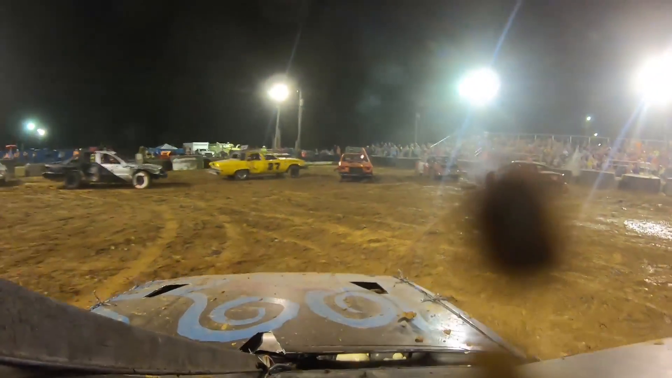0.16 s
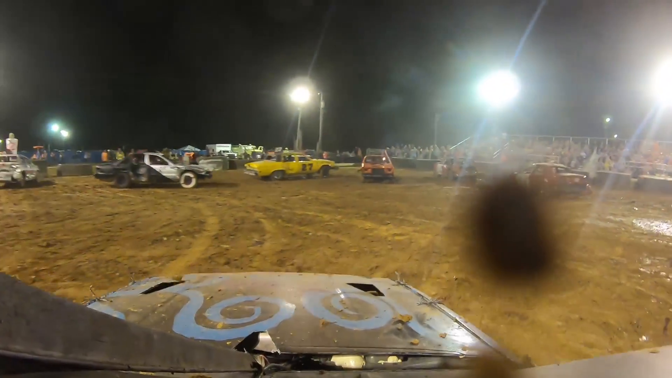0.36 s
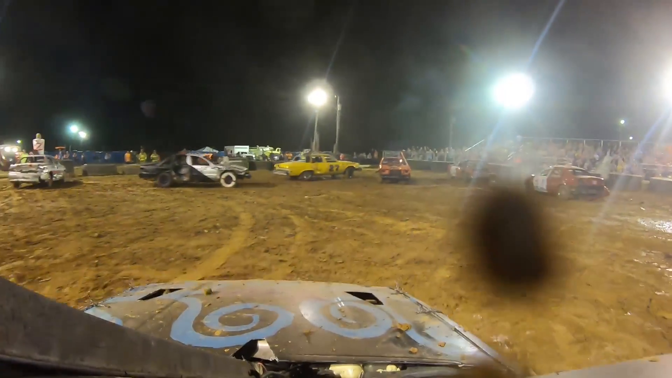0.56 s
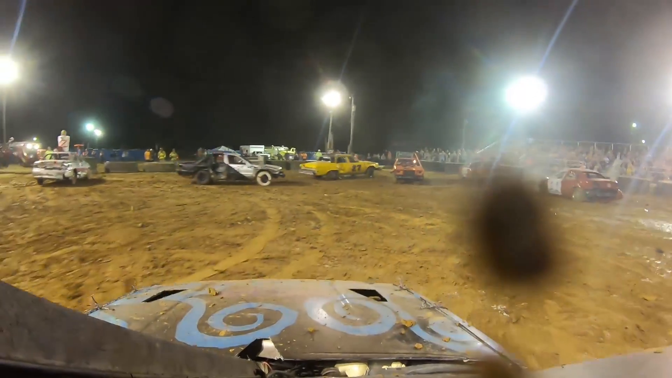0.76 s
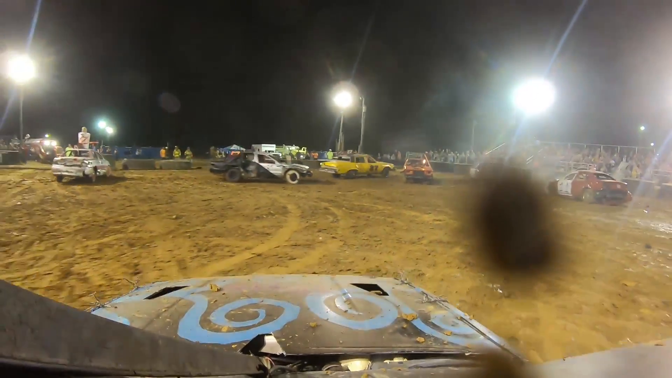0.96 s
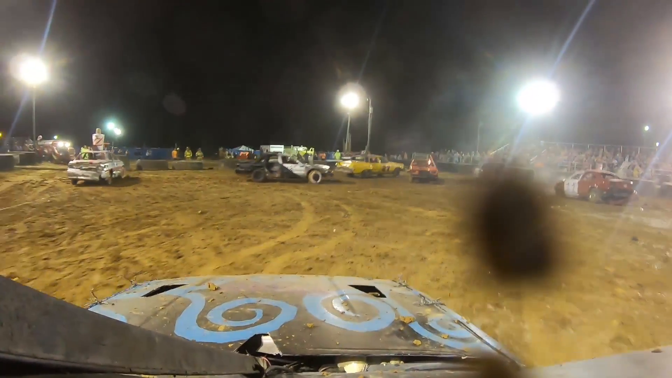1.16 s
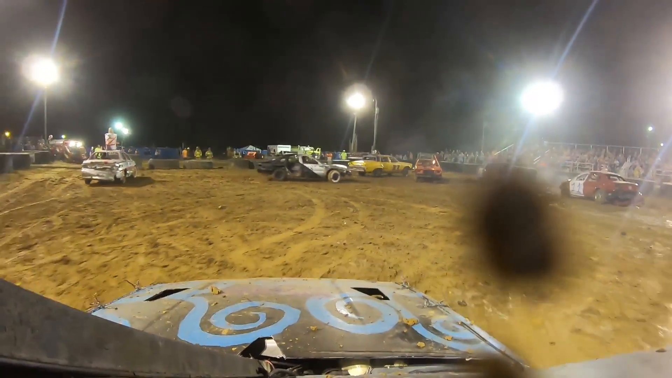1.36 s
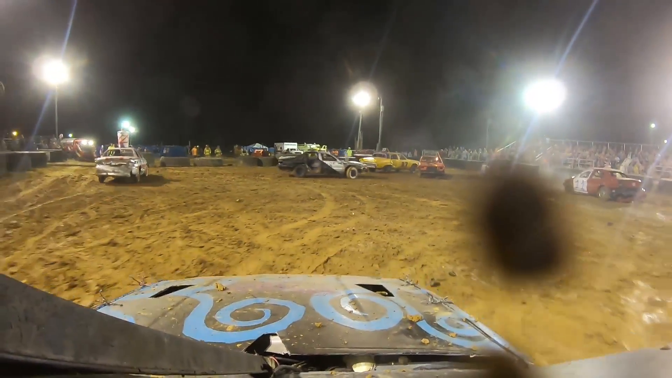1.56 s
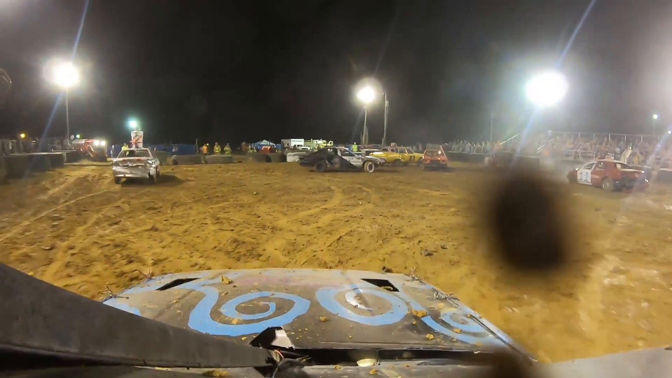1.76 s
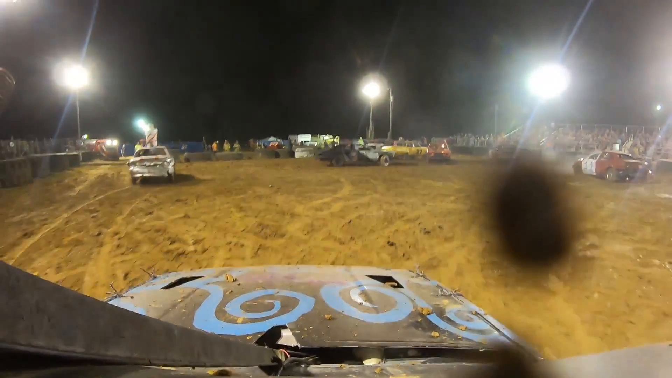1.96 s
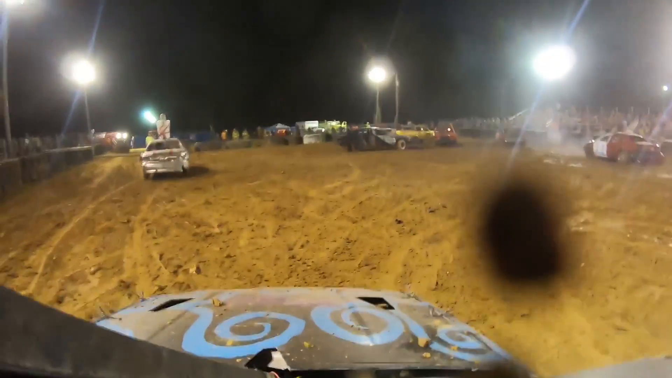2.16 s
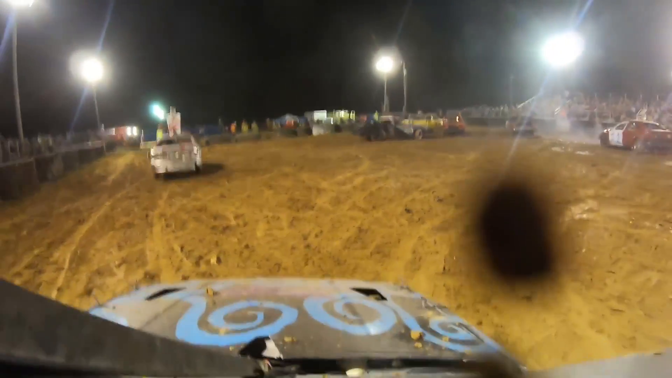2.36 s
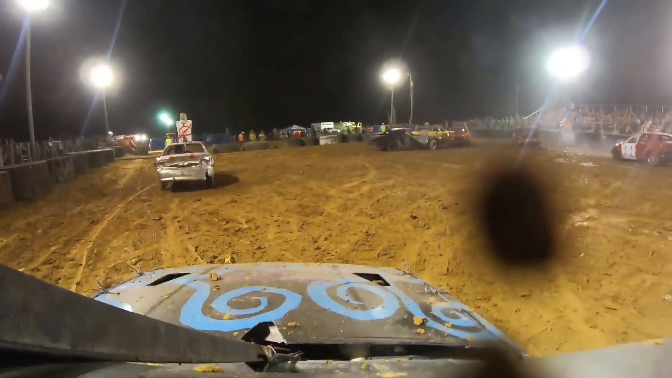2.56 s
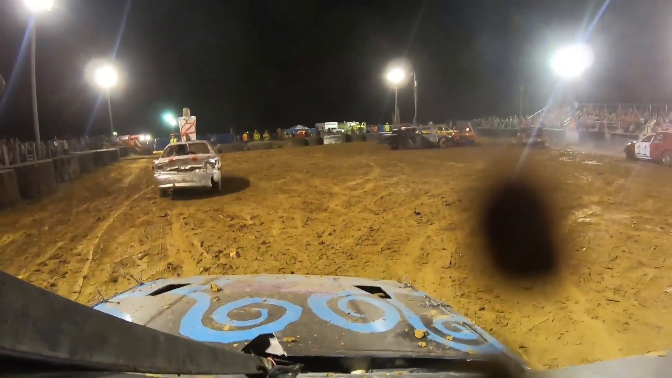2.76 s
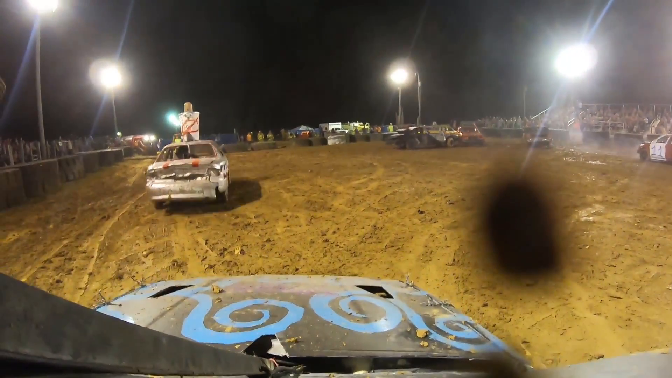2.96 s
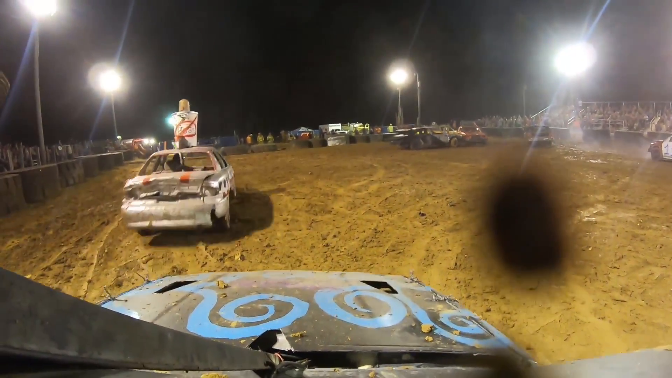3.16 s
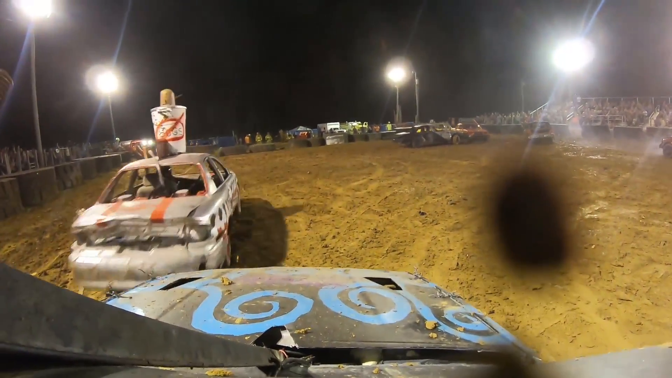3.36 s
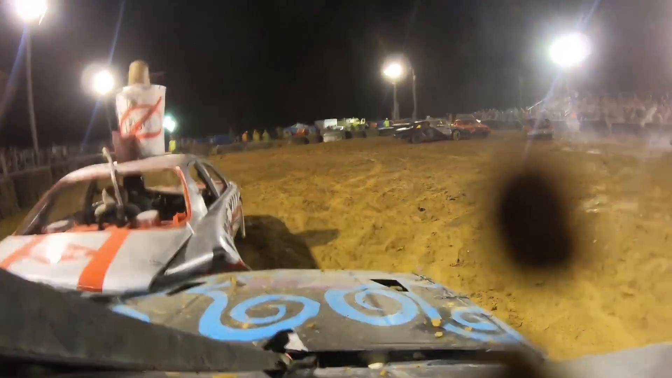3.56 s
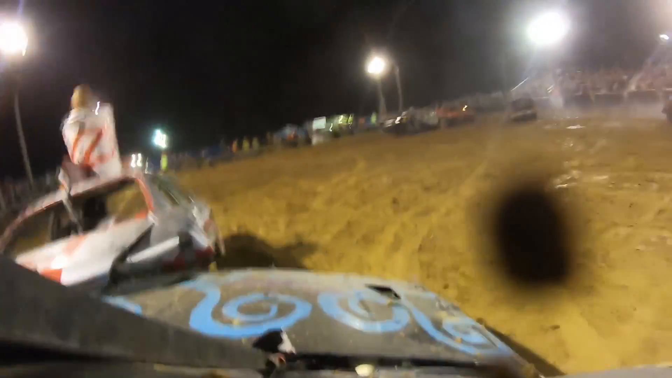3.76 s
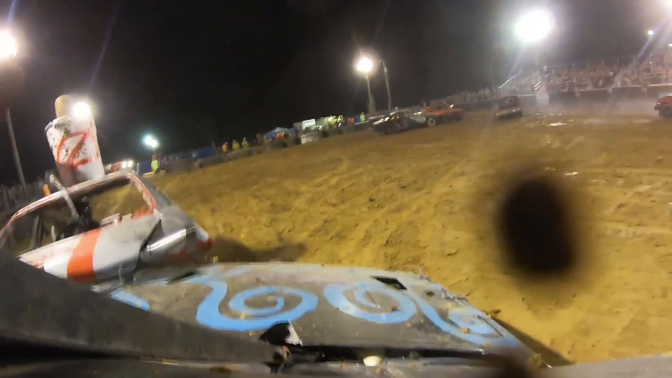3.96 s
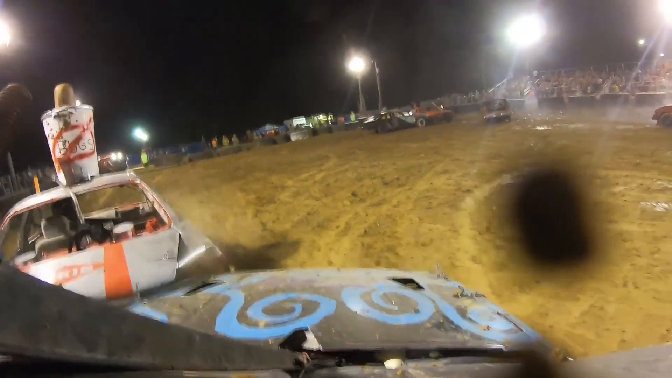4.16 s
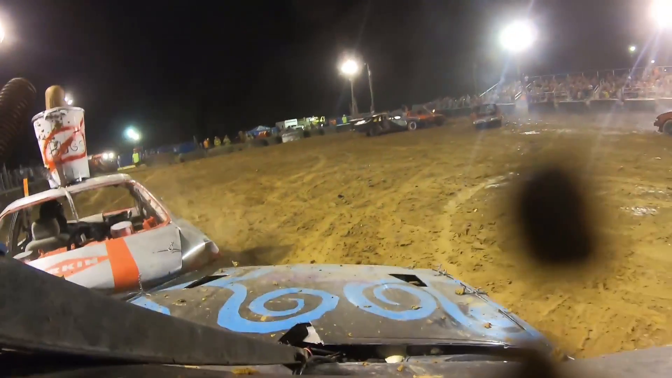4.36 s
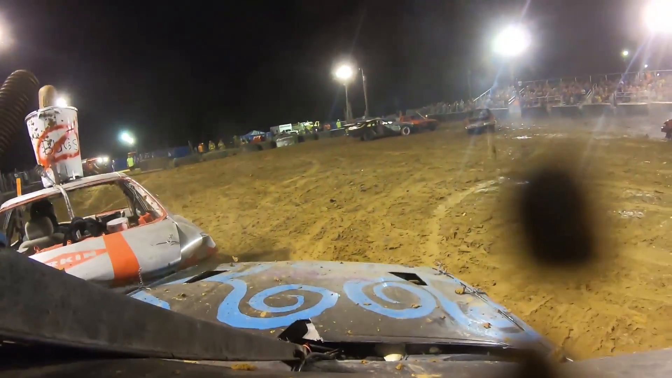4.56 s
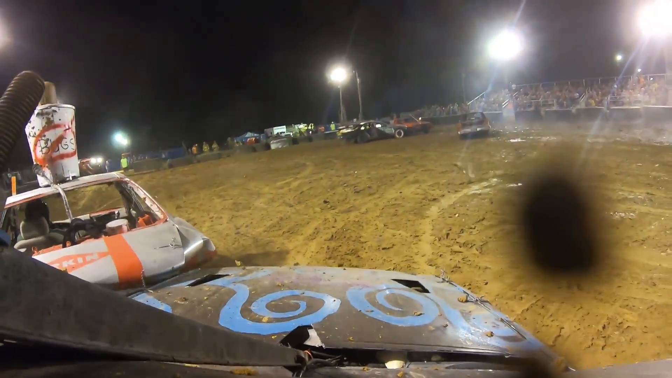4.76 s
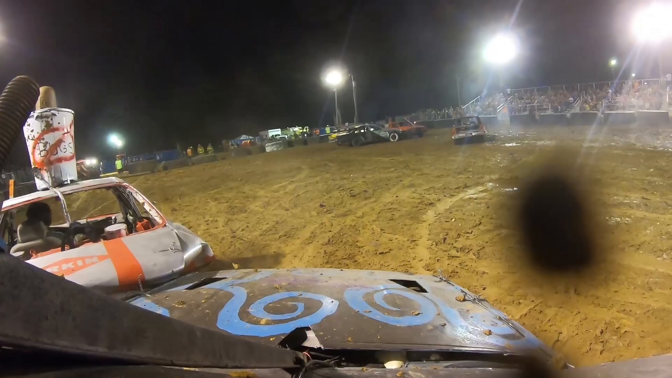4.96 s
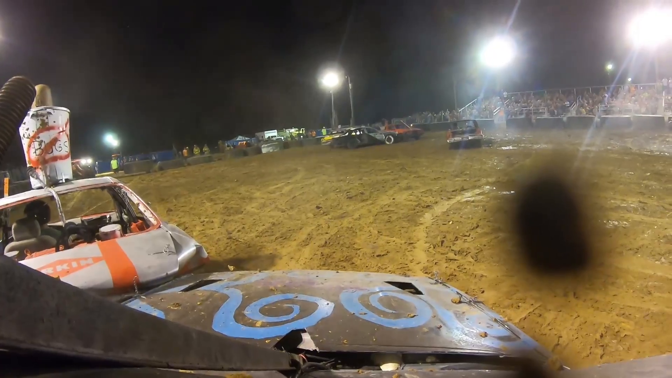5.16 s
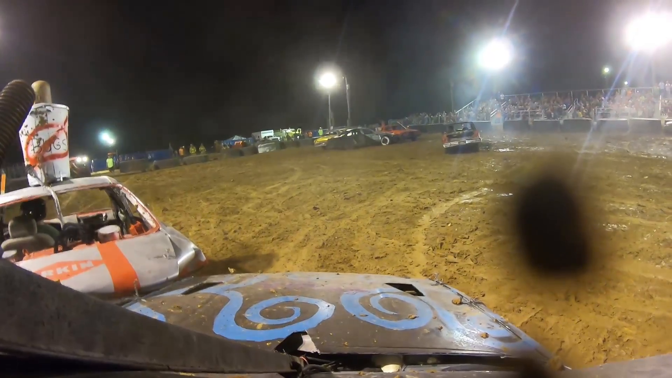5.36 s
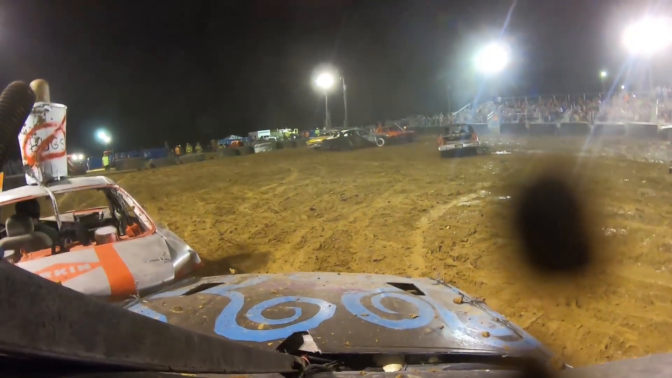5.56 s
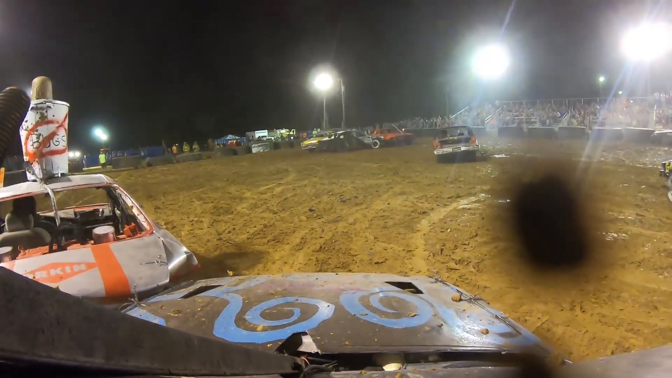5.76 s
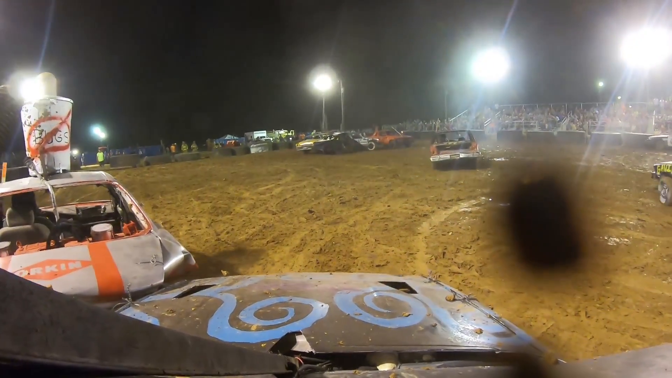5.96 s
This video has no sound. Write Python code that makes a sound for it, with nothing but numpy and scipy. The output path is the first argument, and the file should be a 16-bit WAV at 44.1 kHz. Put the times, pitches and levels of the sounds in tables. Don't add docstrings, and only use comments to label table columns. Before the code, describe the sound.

Inside a stripped derby car on a dirt arena, a muffled exhaust roars over deep shaking rumble. Revs swell, then the camera case rattles hard against its mount in a rapid volley over ruts. After a brief calmer stretch comes a collision, with sharp knocks, short scraping and crunching sheet metal. The engine sinks low, then climbs again among loose clanks. Close, enclosed microphone, compressed and dull.

```python
import sys
import numpy as np
from scipy import signal
from scipy.io import wavfile
from scipy.ndimage import uniform_filter1d

SR = 44100
rng = np.random.default_rng(int(sys.argv[2]) if len(sys.argv) > 2 else 0)


def elevation(decibels):
    levels = np.asarray(decibels, float)
    return 10 ** (levels / 20)


def wav_record(signal):
    frames = np.transpose(np.atleast_2d(signal))
    bounded = np.clip(frames, -1, 1)
    quanta = np.round(bounded * 32767).astype(np.int16)
    wavfile.write(sys.argv[1], SR, quanta)


N = 265041


def evened(x):
    return x / np.sqrt(np.mean(x ** 2) + 1e-20)


def curves(rows):
    s, *columns = np.transpose(rows)
    return [np.interp(np.arange(N) / SR, s, column) for column in columns]


def add(mix, s, sound):
    part = mix[round(s * SR):][:len(sound)]
    part += sound[:len(part)]


def drift(hz):
    return evened(signal.lfilter(*signal.butter(2, hz, fs=SR), rng.standard_normal(N)))


def resonate(x, hz, width):
    turn = np.exp(2j * np.pi * np.cumsum(hz * np.ones(len(x))) / SR)
    r = np.exp(-np.pi * width / SR)
    return 2 * (turn * signal.lfilter([1 - r], [1, -r], x / turn)).real


def resonate_twice(x, hz, width):
    return evened(resonate(resonate(x, hz, width), hz, width))


def ringing(hz, width):
    return resonate_twice(rng.standard_normal(N), hz, width)


def coloured(points, patchy_db):
    frames, hz = N // 256 + 5, np.fft.rfftfreq(1024, 1 / SR)
    a, b, patches = rng.standard_normal((frames, 513, 3)).T
    patches = uniform_filter1d(patches, size=5, axis=0)
    patches = evened(uniform_filter1d(patches, size=12, axis=1))
    f, db = np.transpose(points)
    colour_db = np.interp(np.log(hz + 1), np.log(f), db)[:, None]
    z = (a + 1j * b) * elevation(colour_db + patchy_db * patches)
    return evened(signal.istft(z, nperseg=1024, noverlap=768)[1][:N])


def dipped():
    hold_s, quiet_db, range_db = 0.09, -24, 29
    now, out = np.arange(N) / SR, np.zeros(N)
    for s, db in RUT_KNOCKS + CRASH_KNOCKS:
        depth = np.clip((db - quiet_db) / range_db, 0, 1)
        out = np.maximum(out, depth * (now > s) * np.exp(-(abs(now - s) / hold_s) ** 2))
    return uniform_filter1d(out, size=300)


# start_s, roar_db, rasp_db
EXHAUST_LEVELS = [(0.0, -25.5, -0.5), (.35, -25, 1), (.74, -25, -4), (1.12, -22.5, 2.6), (1.67, -19, -2),
                  (2.08, -21, 1.3), (2.37, -23.5, -2), (2.61, -31, 6), (2.91, -26, 5.5), (3.21, -32, 4.1),
                  (3.53, -26.5, 3.5), (3.81, -25, 4.5), (4.01, -33, -5.5), (4.26, -38, 3.5),
                  (4.61, -37, 6.5), (5.01, -31, 3.2), (5.61, -27, 2), (6.01, -23.5, 5.5)]
# pitch_hz, density_db (dB per Hz)
ROAR_COLOUR = [(400, -8), (560, -21.5), (780, -22.5), (1050, -6), (1180, -14), (1300, -3), (1500, -3.5),
               (1750, -4), (2000, -10), (2230, -14), (2600, -20), (3421, -17.5), (3621, -25.5), (4601, -67)]
# pitch_hz, density_db (dB per Hz)
HISS_COLOUR = [(3001, 1.5), (3701, 4.6), (4301, 7), (4801, 5.5), (5301, -6.5), (5801, -34.5)]
# pitch_hz, density_db (dB per Hz)
AIR_COLOUR = [(4801, -18.5), (5601, -1.7), (7001, .6), (7501, -4.5), (8051, 2), (8701, -4.6), (9701, -5.5),
              (10301, -18.6), (11201, -14.5), (12501, -23.5), (14001, -32), (16001, -49)]


def exhaust(motion):
    throb = elevation(1.0 * evened(motion) + 0.88 * drift(100))
    (roar_db, rasp_db), dip = curves(EXHAUST_LEVELS), dipped()
    swell_s, swell_length_s, swell_db = 0.97, 0.31, 7.5
    swell = np.exp(-((np.arange(N) / SR - swell_s) / swell_length_s) ** 2)
    lid = elevation(swell_db * swell) * ringing(2187, 193)
    whistle_db = -52.0 + 3.2 * (roar_db + 20) - 12 * dip
    out = elevation(whistle_db) * evened(throb ** 2 * ringing(5260, 540))
    # layer, level over the roar in dB, share of the rasp, loss in the dip after a knock in dB
    layers = [(coloured(ROAR_COLOUR, patchy_db=1.5), -0.94, -0.13, -3),
              (coloured(HISS_COLOUR, patchy_db=1.5), -21.6, 1.2, -5),
              (coloured(AIR_COLOUR, patchy_db=2.0), -32, 0.54, -12),
              (lid, -11.5, 0.032, -7)]
    for layer, leak_db, rasp_share, loss_db in layers:
        level_db = roar_db + leak_db + rasp_share * rasp_db + loss_db * dip
        out += elevation(level_db) * evened(throb * layer)
    return out


def chassis_mode(rows, rest_db, wobble, flutter_db):
    now, hz = np.arange(0, N, 32) / SR, curves(rows)[0]
    power = elevation(rest_db) ** 2
    for s, _, db, length in rows:
        power = power + elevation(db) ** 2 * np.exp(-(2.23 * (now - s) / length) ** 2)
    size = np.interp(np.arange(N) / SR, now, np.sqrt(2 * power))
    turns = np.cumsum(hz * (1 + wobble * drift(16))) / SR
    return size * elevation(flutter_db * drift(22)) * np.sin(2 * np.pi * (turns + rng.random()))


# centre_s, pitch_hz, peak_db, length_s
SWAY_SWELLS = [(0.04, 40.58, -23.5, 0.037), (0.37, 39.69, -15, 0.16), (0.56, 39.8, -14.5, 0.099),
               (0.98, 37.75, -16, .07), (1.2, 38.32, -18.5, 0.11), (1.45, 38.62, -20, 0.26),
               (1.78, 38.64, -14.5, 0.18), (1.96, 39.03, -19.5, 0.14), (2.39, 39.92, -12, .14),
               (2.8, 40.04, -18.5, .08), (3.0, 39.46, -16, 0.073), (3.18, 38.84, -18.5, 0.23),
               (3.73, 38.07, -16, 0.3), (4.2, 39.95, -15, .2), (4.38, 42, -15, 0.051),
               (4.6, 42.53, -23, 0.092), (4.85, 42.58, -26.5, .15), (5.62, 43.3, -22.5, 0.12),
               (5.95, 40.04, -23.5, .2)]
# centre_s, pitch_hz, peak_db, length_s
FRAME_SWELLS = [(0.1, 60.4, -14.5, 0.16), (0.26, 61.26, -17.5, 0.092), (0.46, 61.61, -17.5, 0.088),
                (0.76, 62.59, -16.5, 0.33), (1.15, 66.65, -17, .1), (1.3, 59.73, -17.5, 0.32),
                (1.49, 65.17, -20, 0.048), (1.68, 58.23, -9.5, 0.058), (1.82, 55.52, -13.5, 0.066),
                (1.99, 58.86, -14.5, .14), (2.17, 72.35, -16, .08), (2.55, 59.8, -18.5, 0.091),
                (2.89, 61.68, -17, 0.23), (3.38, 62.93, -18, 0.2), (3.61, 67.4, -16, 0.039),
                (3.79, 71.84, -17, 0.2), (4.27, 54.39, -19, .16), (4.48, 56.54, -15, 0.092),
                (4.8, 66.25, -13, 0.16), (4.95, 69.1, -13.5, 0.073), (5.21, 61.56, -20.5, .15),
                (5.38, 71.3, -15.5, .14), (5.5, 63.42, -13.5, .12), (5.74, 60.3, -17.5, 0.19),
                (5.97, 65.5, -15, 0.2)]
# centre_s, pitch_hz, peak_db, length_s
PANEL_SWELLS = [(0.0, 88.2, -19, .15), (0.21, 93.8, -16.5, 0.18), (0.63, 97.8, -18, 0.12),
                (0.84, 102.6, -22.5, .18), (1.02, 98.8, -18, 0.11), (1.27, 99.8, -20, 0.089),
                (1.44, 103, -16.5, 0.055), (1.6, 100.8, -17.5, 0.12), (1.9, 94.8, -19, .1),
                (2.07, 97, -16, 0.044), (2.18, 104, -13.5, 0.23), (2.44, 96.1, -20, 0.1),
                (2.66, 99.46, -20.5, .1), (2.85, 97.95, -19, .1), (3.22, 97, -23.5, 0.062),
                (3.43, 97, -18.5, 0.22), (3.65, 108.2, -20, 0.28), (3.98, 99.9, -16.5, 0.17),
                (4.37, 97, -23, 0.18), (4.94, 96, -17.5, 0.047), (5.03, 100.8, -18.5, 0.053),
                (5.13, 104.5, -15, .12), (5.26, 105.9, -14, 0.088), (5.47, 95.5, -19.5, .08),
                (5.62, 103.2, -20.5, 0.15), (5.82, 94.9, -23, 0.072)]


def chassis():
    sway = chassis_mode(SWAY_SWELLS, rest_db=-26.0, wobble=0.045, flutter_db=1.2)
    boom = chassis_mode(FRAME_SWELLS, rest_db=-24.5, wobble=0.045, flutter_db=1.2)
    panel = chassis_mode(PANEL_SWELLS, rest_db=-31.0, wobble=0.055, flutter_db=2.2)
    thud = elevation(-23.5) * ringing(82, 76)
    sub = elevation(-33.0) * ringing(27, 12)
    return sway + boom + panel + thud + sub


# start_s, strength_db, pitch_hz (of the loudest mode)
BRACKET_SHAKE = [(0.0, -28, 185), (0.35, -22.5, 241), (0.8, -26.5, 228.5), (1.07, -22, 239.5),
                 (1.45, -19.5, 201.3), (1.85, -15.5, 225), (2.0, -18.5, 235), (2.09, -11, 235.4),
                 (2.39, -12, 224.7), (2.47, -15.5, 227.9), (2.95, -22, 230), (3.55, -34, 195.5),
                 (3.63, -13.5, 237.3), (4.15, -20.5, 201.8), (4.75, -36, 235), (5.2, -22, 205.4),
                 (5.65, -24.5, 224), (6.01, -21.5, 252)]
# pitch_hz, width_hz, level_db
LOW_MODES = [(129.8, 19.3, 0.5), (170.6, 14, -4), (194.2, 47, 1.5), (217.6, 11, -10)]
# pitch_hz, width_hz, level_db
UPPER_MODES = [(315, 154, 4), (407, 69, 0.5), (482, 31.5, 5.5)]


def bracket():
    out, (low_db, loud_hz) = np.zeros(N), curves(BRACKET_SHAKE)
    upper_db = -31.0 + 1.36 * (low_db + 21)
    low_modes = LOW_MODES + [(loud_hz, 14, 0.0)]
    for modes, level_db in ((low_modes, low_db), (UPPER_MODES, upper_db)):
        jolts = rng.standard_normal(N) * elevation(3.6 * drift(50))
        ring = np.zeros(N)
        for hz, width, db in modes:
            once = resonate(jolts, hz, 1.59 * width)
            ring += elevation(db) * evened(resonate(once, hz, 1.53 * width))
        out += elevation(level_db - 0.93) * evened(ring)
    return out


# start_s, bite_s, release_s, peak_db, crunch_db
GRINDS = [
    (3.589, 0.058, 0.012, -18.5, -15.5),
    (3.829, .081, 0.09, -14.5, -2),
]


def grind(wide, crunch, sizzle):
    start_db, end_db = -12.5, -25.5
    grain, now, out = evened(elevation(2.3 * drift(160))), np.arange(N) / SR, np.zeros(N)
    for s, bite, release, db, crunch_db in GRINDS:
        end = s + bite + release
        touching = uniform_filter1d(1. * (now > s) * (now < end), size=200)
        push_db = db + np.interp(now, [s, s + bite, end], [start_db, 0, end_db])
        sizzle_db = -39.5 - 1.7 * crunch_db
        scrape = wide + elevation(crunch_db) * crunch + elevation(sizzle_db) * sizzle
        out += touching * grain * elevation(push_db) * scrape
    return out


# start_s, peak_db, pitch_hz
PANEL_CLANKS = [(1.299, -14, 1610), (1.3588, -26, 1310), (1.7015, -20, 1440), (1.723, -14, 1410),
                (2.521, -14.5, 997), (2.784, -11, 1690), (3.575, -10.5, 1814), (3.584, -33, 1857),
                (3.6244, -15, 1050), (3.736, -12, 1910), (3.894, -13.5, 1160), (4.0027, -14.5, 1196),
                (4.0317, -14.5, 1360), (4.1, -23, 1768), (4.162, -23.5, 1016), (4.189, -26.5, 1030),
                (4.2759, -24, 1830), (4.4134, -25, 1898), (4.5017, -23.5, 1955), (4.56, -27, 1885),
                (4.648, -27, 1860), (4.785, -26, 1720), (4.924, -24.5, 1740), (5.058, -25.5, 1850),
                (5.1691, -17, 1837), (5.204, -15, 1815), (5.4532, -12, 1852), (5.51, -17.5, 1860),
                (5.7624, -18.5, 1060), (5.8123, -22, 1290)]


def sheet_metal():
    t = np.arange(5000) / SR
    wide = signal.lfilter(*signal.butter(2, 3600, fs=SR), coloured(ROAR_COLOUR, patchy_db=2.0))
    crunch = evened(signal.lfilter(*signal.butter(4, 2000, fs=SR), ringing(894, 750)))
    sizzle = coloured(HISS_COLOUR, patchy_db=3.0) + elevation(-15.5) * coloured(AIR_COLOUR, patchy_db=7.0)
    sizzle = evened(sizzle)
    out = grind(wide, crunch, sizzle)
    shape = (1 - np.exp(-t / 0.003)) * np.exp(-(t / 0.028) ** 2)
    strut = (1 - np.exp(-t / 0.0014)) * np.exp(-(t / 0.03) ** 2) * np.sin(2 * np.pi * 494 * t)
    for s, db, hz in PANEL_CLANKS:
        wedged = 3.95 < s < 4.62
        crunch_db = -13 - 14.5 * np.log2(hz / 1000) + 14 * wedged
        sizzle_db = -44 - 0.4 * db - 18.0 * wedged
        rattle, dull, thin = (x[round(s * SR):][:len(t)] for x in (wide, crunch, sizzle))
        sound = 0.49 * rattle + 0.39 * resonate_twice(rattle, hz, 230)
        sound = sound + elevation(crunch_db) * dull + elevation(sizzle_db) * thin
        struck = 0.79 * np.exp(-t / 0.011) * np.sin(2 * np.pi * hz * t)
        add(out, s, elevation(db - 2.5) * shape * (sound + struck))
        add(out, s, elevation(db - 10 + 14.0 * wedged - 8.0) * strut)
    return out


# pitch_hz, level_db, t60_s
CASE_MODES = [(1363, 17, .0054), (1844, 19, 0.0077), (2410, 7, .008), (3060, 1, 0.017), (4180, -1.5, 0.013),
              (4766, -1.5, 0.0096)]
# pitch_hz, level_db, t60_s, first_swing (1 up, -1 down)
MOUNT_THUMP = [(190, 0, .04, 1), (390, 0, .016, -1)]
# start_s, peak_db
RUT_KNOCKS = [(2.1544, -13), (2.1788, -8), (2.2072, -4), (2.2316, -6.5), (2.2596, -5), (2.3084, -9),
              (2.3326, -28), (2.3541, -16.5), (2.375, -7), (2.4033, -8), (2.4288, -12), (2.4548, -3.5),
              (2.4804, -6.5), (2.5064, -6.5), (2.5404, -19.5), (2.5587, -16), (2.5904, -9.5),
              (2.638, -13.5), (2.6689, -16.5), (2.6879, -20.5), (2.758, -17), (3.03, -25.5), (3.0536, -20)]
# start_s, peak_db
CRASH_KNOCKS = [(3.6614, -5), (3.7448, -8.5), (3.7724, -3.5), (3.8014, -4), (3.8272, -9), (3.8554, -6),
                (3.8821, -12.5), (3.9015, -10.5), (3.9357, -15.5), (4.0006, -24), (4.0573, -13.5),
                (4.0855, -20.5), (4.1452, -18), (4.1669, -44), (4.5032, -31.5), (4.656, -46)]


def knocks():
    out, t = np.zeros(N), np.arange(3000) / SR
    rows, shake_db = RUT_KNOCKS + CRASH_KNOCKS, curves(BRACKET_SHAKE)[0]
    chance = 2 * rng.random((len(rows), 13)) - 1
    blunt, duller = signal.butter(3, 4500, fs=SR), signal.butter(2, 2600, fs=SR)
    gritty = signal.butter(2, [5600, 11500], "band", fs=SR)
    thump = np.zeros(len(t))
    for hz, level_db, t60, way in MOUNT_THUMP:
        thump += way * elevation(level_db - 60 * t / t60) * np.sin(2 * np.pi * hz * t)
    thump *= 1 - np.exp(-t / 0.0007)
    for (s, heard_db), r in zip(rows, chance):
        db = 1.15 * heard_db + 5.0
        thump_db = -5 + 0.44 * heard_db + 0.54 * (shake_db[round(s * SR)] + 8)
        edge_db = -42.5 + 0.4 * (heard_db + 8.5) - 7 * r[12]
        edge_db += 7.5 * (s > 3.7)
        ring = np.zeros(len(t))
        for (hz, level_db, t60), shift, more_db in zip(CASE_MODES, 1 + 0.04 * r[6:12], 3 * r[:6]):
            ring += elevation(level_db + more_db - 60 * t / t60) * np.sin(2 * np.pi * hz * shift * t)
        ring = signal.lfilter(*blunt, ring * (1 - np.exp(-(t / 0.0006) ** 2)))
        ring /= abs(ring).max()
        grit = evened(signal.lfilter(*gritty, rng.standard_normal(len(t))))
        grit = elevation(edge_db - 60 * t / 0.013) * grit * (1 - np.exp(-t / 0.0008))
        bounce = signal.lfilter(*duller, ring) + 0.35 * grit
        add(out, s + 0.0004, elevation(db) * (ring + grit))
        add(out, s + 0.005, elevation(db - 7.5) * bounce)
        add(out, s + 0.0006, elevation(thump_db + 12) * thump)
    return out


def scene():
    shell = chassis()
    return (exhaust(shell) + shell + bracket() + sheet_metal() + knocks())[None]


def top_cut(x):
    return signal.sosfilt(signal.butter(12, 15660, fs=SR, output="sos"), x)


def record(dry):
    peak_db = 20 * np.log10(abs(dry[0]) + 1e-6)
    fall_db = np.arange(N) * 170.0 / SR
    over_db = np.maximum(np.maximum.accumulate(peak_db + fall_db) - fall_db + 3.0, 0)
    late_db = signal.lfilter(*signal.butter(2, 300, fs=SR), over_db)
    held = np.tanh(dry / elevation(0.67 * late_db))
    mix = signal.sosfilt(signal.butter(8, 15100, fs=SR, output="sos"), held)
    return top_cut(mix)


dry = scene()
out = record(dry)
wav_record(out)
```